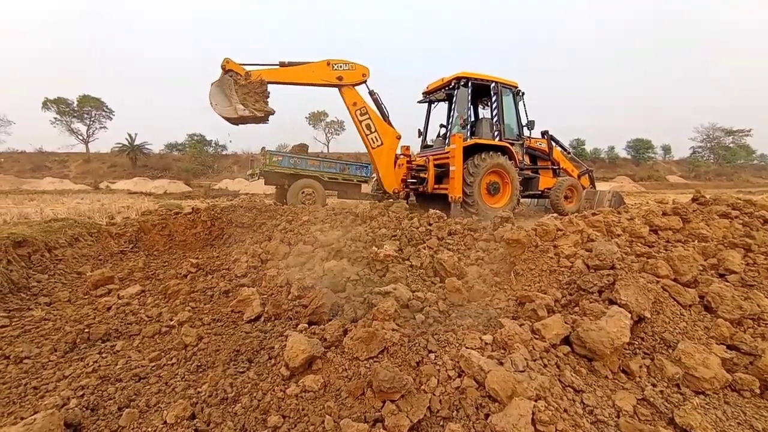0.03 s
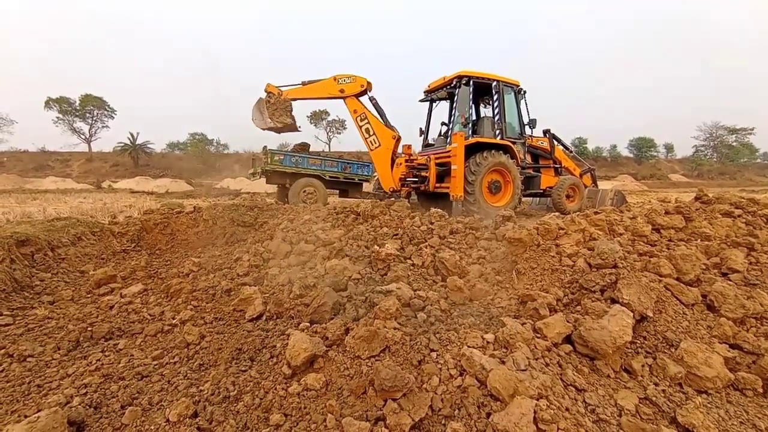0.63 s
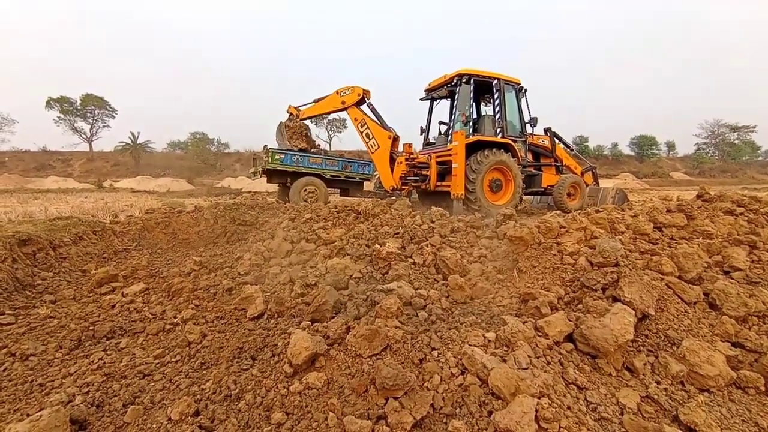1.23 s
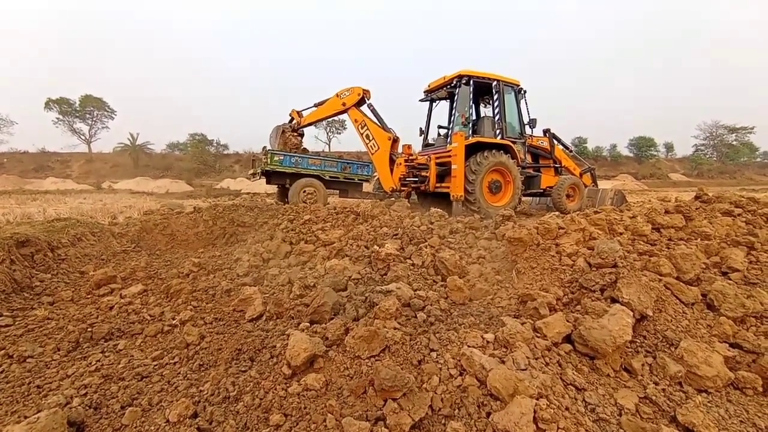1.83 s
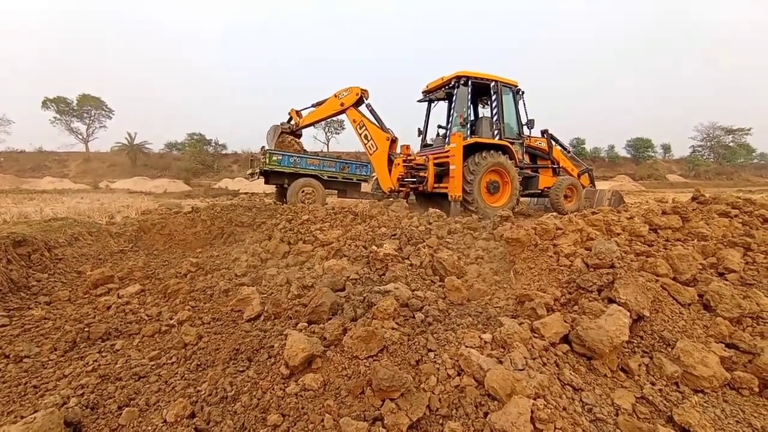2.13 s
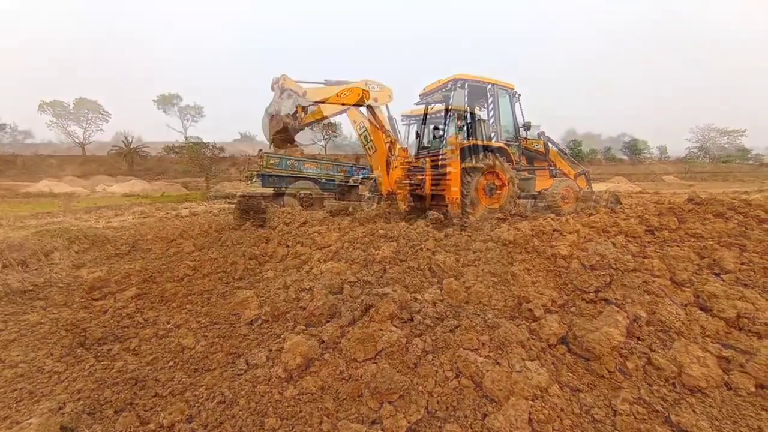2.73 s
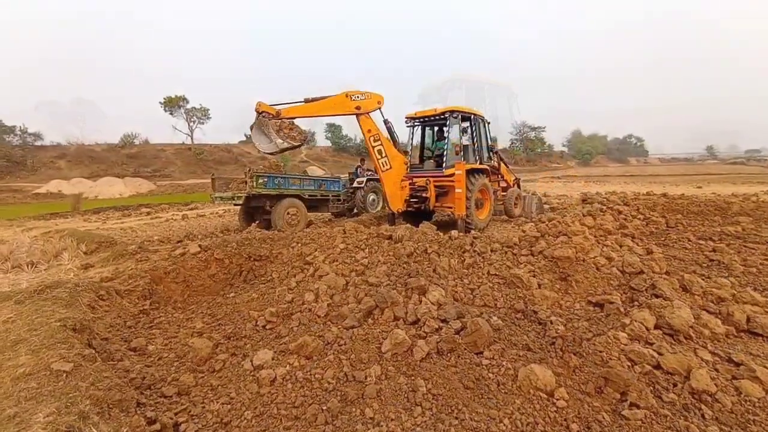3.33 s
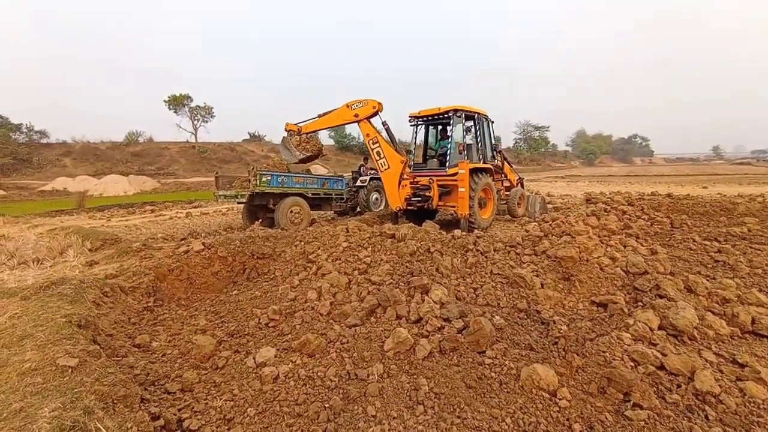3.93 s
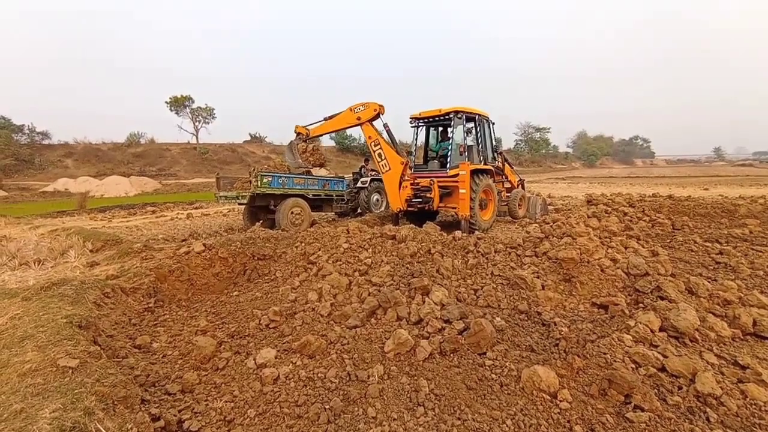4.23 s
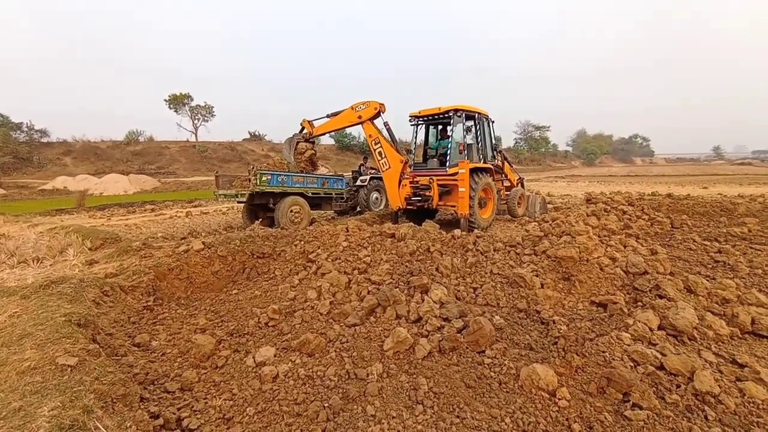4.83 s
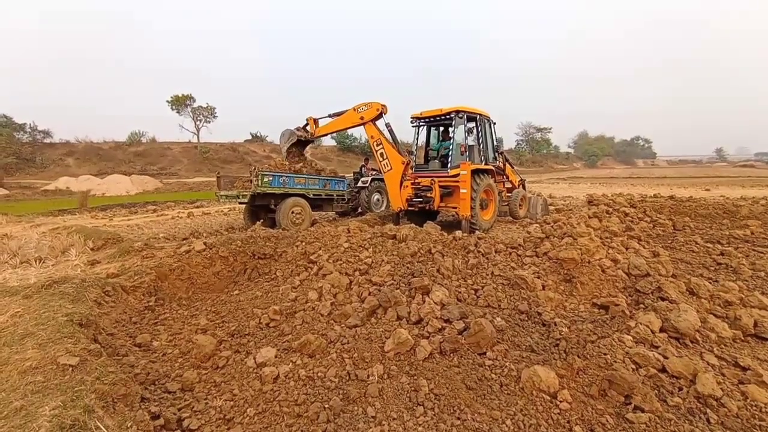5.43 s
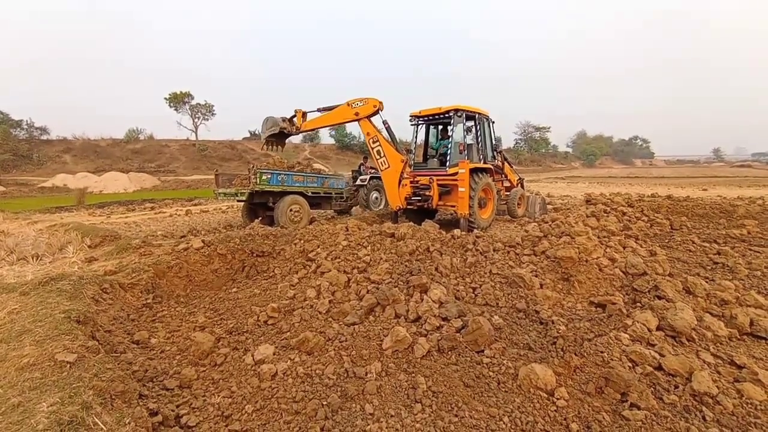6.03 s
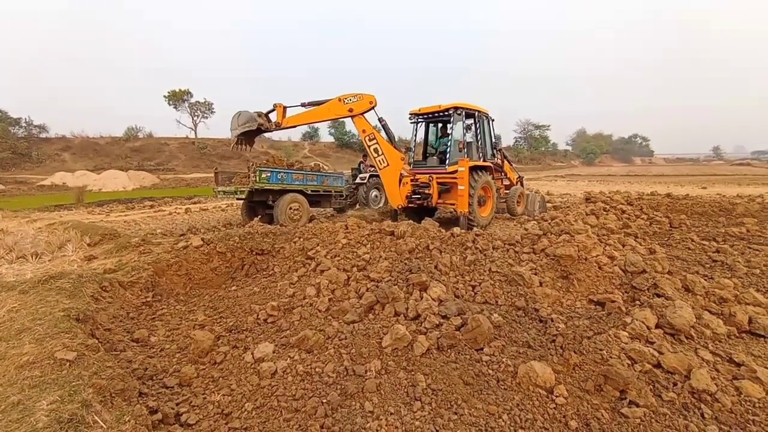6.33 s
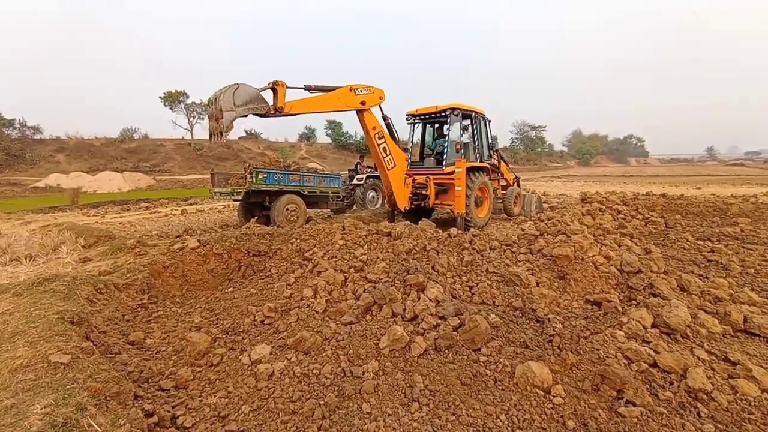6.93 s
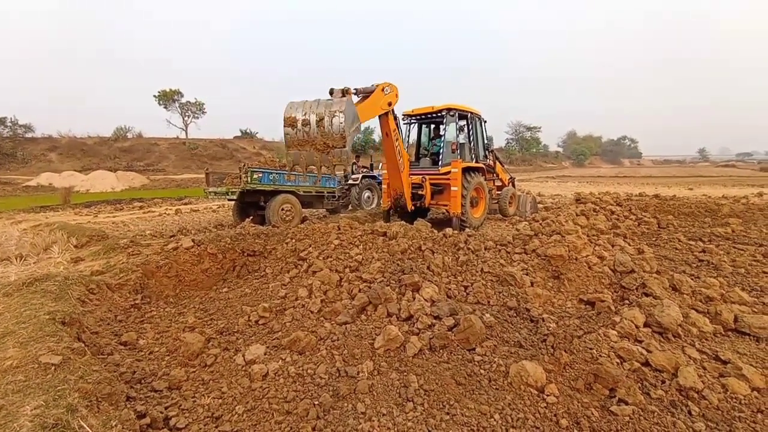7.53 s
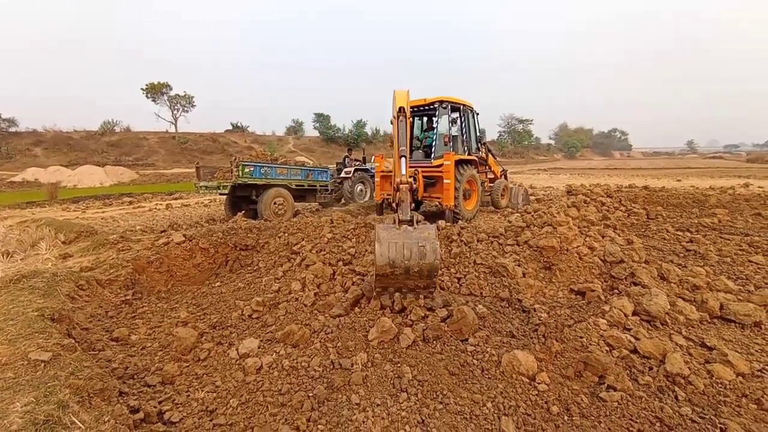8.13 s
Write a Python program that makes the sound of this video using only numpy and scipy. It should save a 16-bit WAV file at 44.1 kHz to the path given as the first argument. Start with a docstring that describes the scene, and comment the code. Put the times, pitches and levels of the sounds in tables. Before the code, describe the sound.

Dry earth thuds and crumbles into a steel trailer over a backhoe's steady diesel rumble, with metal rattles and hydraulic hiss.

```python
"""A backhoe loader's four-cylinder diesel works in an open field, heard from the side, then from
behind and closer. Its firings drive the exhaust drone and pulse the rumble, block clatter and hiss.
The bucket tips dry clods into a steel trailer: they boom on its bed and crumble into grit.
The arm rattles, its pivots squeak, oil rushes through a valve and a light breeze blows."""
import sys
import numpy as np
from scipy import signal
from scipy.fft import rfft, irfft
from scipy.io import wavfile

SR = 44100
rng = np.random.default_rng(int(sys.argv[2]) if len(sys.argv) > 2 else 0)


def wav_out(sig):
    """Save sig, one row per channel (or a flat mono array), as 16-bit PCM at SR to the path in sys.argv[1]."""
    wavfile.write(sys.argv[1], SR, np.round(np.clip(np.atleast_2d(sig).T, -1, 1) * 32767).astype(np.int16))


N = 361179
TIME = np.arange(N) / SR
CUTOFF_HZ = 15600

# Clods landing on the trailer bed. Each row: start in seconds, boom in dB, boom pitch in Hz, crunch in
# dB, grit in dB, breaking time in seconds, struck spot's ring in Hz, its lift in dB, treble limit in Hz.
CLOD_HITS = [(2.171, -15.5, 270, -46, -50, .014, 1500, 4, 9000),
             (2.449, -20, 142, -38, -52, .008, 700, 0, 9000),
             (2.675, -16, 255, -52, -62, .0064, 700, 0, 9000),
             (3.006, -11.5, 256.5, -20.5, -68, .003, 1150, 6, 4000),
             (4.891, -4.5, 245, -18.5, -25, .002, 1300, 5, 17000),
             (4.903, -6.5, 260, -26, -22.5, .005, 7900, 7, 16000),
             (4.936, -18, 248, -16.5, -22.5, .0031, 2380, 8, 16000),
             (4.949, -20, 250, -26.5, -46, .004, 1330, 9, 9000),
             (5.091, -7.5, 279.7, -27, -29, .0041, 5800, 4, 17000),
             (5.11, -3.5, 174.8, -28, -66, .0059, 740, 4, 9000),
             (5.145, -7, 193, -32, -62, .0079, 700, 0, 9000),
             (5.345, -8, 170.4, -50, -47, .0062, 700, 0, 9000),
             (5.638, -18, 250, -26, -33.5, .016, 3800, 9, 15000),
             (5.672, 1, 234.6, -23, -29.5, .013, 9700, 4, 15000),
             (5.68, -5, 310, -27, -28.5, .004, 9700, 4, 15000),
             (5.697, -0.5, 275, -21.5, -37, .0051, 720, 4, 12000),
             (5.975, -3.5, 210.2, -17.5, -38, .013, 2300, 5, 12000),
             (6.043, -3.5, 205.6, -21, -45, .0067, 660, 8, 11000),
             (6.103, -3.5, 235, -23, -15, .0046, 1430, 11, 6200),
             (7.526, -8, 185.3, -20, -41, .021, 1130, 12, 7000),
             (7.595, -2, 262.4, -10, -27, .002, 3800, 7, 5600),
             (7.606, -3, 275, -35, -36, .008, 700, 0, 5500),
             (7.617, -2, 177.4, -34, -50, .006, 700, 0, 9000),
             (7.645, -9, 263, -42, -59, .007, 700, 0, 9000),
             (7.682, -8, 258.3, -19, -41, .004, 1450, 6, 7000),
             (7.712, -11, 258, -40, -52, .016, 700, 0, 6000)]


def from_db(db):
    """Decibels to gain."""
    return np.exp(np.asarray(db) * (np.log(10) / 20))


def unit_rms(x):
    """Scale to unit rms."""
    return x / np.sqrt(np.mean(x ** 2) + 1e-20)


def curve(rows):
    """Straight lines through (seconds, value) points, one value per sample."""
    return np.interp(TIME, *np.transpose(rows))


def drift(rate_hz, step=1):
    """Smooth random wander of unit rms, at every step-th sample."""
    pole = np.exp(-200 * np.pi * rate_hz / SR)
    slow = signal.lfilter([1], [1, -2 * pole, pole * pole], rng.standard_normal(N // 100 + 1002))[1000:]
    return np.interp(np.arange(0, N, step) / 100, np.arange(len(slow)), unit_rms(slow))


def noise():
    """Two independent white noises."""
    return rng.standard_normal((2, N))


def colour(x, spectrum, taps=4096):
    """Minimum-phase filter through (Hz, dB) points."""
    hz, db = np.transpose(spectrum)
    grid_hz = np.maximum(np.arange(taps // 2 + 1) * SR / taps, 1)
    cepstrum = irfft(np.log(from_db(np.interp(np.log(grid_hz), np.log(hz), db))))
    cepstrum[1:taps // 2] *= 2
    cepstrum[taps // 2 + 1:] = 0
    return signal.oaconvolve(x, irfft(np.exp(rfft(cepstrum)))[None], axes=1)[:, :N]


def resonate(x, modes):
    """Each mode lifts or cuts a narrow band."""
    for hz, width_hz, lift_db in modes:
        band = signal.lfilter(*signal.iirpeak(hz, hz / width_hz, fs=SR), x)
        x = x + (from_db(lift_db) - 1) * band
    return x


def part_gain(rear, effort_db, side_db, rear_db, effort_share):
    """Gain of an engine part: set by the listening side, raised by effort."""
    return from_db((1 - rear) * side_db + rear * rear_db + effort_share * effort_db)


def firing_noise(turns, depth, decay_cycles, uneven_db):
    """Noise that surges at each firing, twice a turn, never equally hard."""
    # Strength of each cylinder in dB.
    cylinder_db = [0.29, -0.75, -0.5, 0.69]
    firing, since = np.divmod(2 * turns, 1)
    firing = firing.astype(int)
    white = noise()
    strength_db = np.take(cylinder_db, firing, mode="wrap") + uneven_db * rng.standard_normal(N)[firing]
    return white * unit_rms(1 + depth * from_db(strength_db) * np.exp(-since / decay_cycles))


def exhaust_rumble(turns, rear, effort_db):
    """Rough gas flow puffs out at each firing."""
    # Flow spectra from the side and the rear. Each row: frequency in Hz, relative level in dB.
    side_spectrum = [(25, -22), (55, -13), (85, -3), (140, -2), (195, -5.5), (260, -5.5), (340, 7),
                     (405, -12.5), (700, -39), (3000, -79)]
    rear_spectrum = [(25, -36), (55, -16.5), (85, -2.5), (125, -5), (165, 2), (205, 3.5), (290, 1.5),
                     (350, -7), (410, -6), (700, -37.5), (3000, -76)]
    puffs = firing_noise(turns, depth=2.5, decay_cycles=.3, uneven_db=1.5)
    rumble = np.sqrt(1 - rear) * unit_rms(colour(puffs, side_spectrum))
    rumble += np.sqrt(rear) * unit_rms(colour(puffs, rear_spectrum))
    return rumble * part_gain(rear, effort_db, side_db=-34, rear_db=-28.5, effort_share=.4)


def block_clatter(turns, rear, effort_db):
    """Cylinder knock rings the block and panels."""
    # Block spectrum. Each row: frequency in Hz, relative level in dB.
    block_spectrum = [(100, -40), (400, -13.5), (480, -3.5), (620, -4.5), (770, -4.5), (860, -8.5),
                      (1090, -11.5), (1240, -12.5), (1430, -13.5), (1670, -25.5), (2000, -20),
                      (3000, -26.5), (4000, -34), (9000, -63)]
    # Panel resonances. Each row: frequency in Hz, width in Hz, lift in dB.
    panel_modes = [(527.6, 28, 11.5), (747, 12, 6), (918, 38, 4), (1103, 41, 7), (1450, 44, 5.5),
                   (1800, 27, 7)]
    knocks = firing_noise(turns, depth=1.25, decay_cycles=.27, uneven_db=3.9)
    clatter = unit_rms(resonate(colour(knocks, block_spectrum), panel_modes))
    return clatter * part_gain(rear, effort_db, side_db=-38, rear_db=-31.2, effort_share=.76)


def fan_hiss(turns, rear, rasp_db=.9):
    """Fan and oil valves hiss through the cowl and oil lines; from the side the hiss rasps."""
    # Hiss spectrum. Each row: frequency in Hz, relative level in dB.
    hiss_spectrum = [(700, -22), (1600, 3), (1900, 6.5), (2700, 2.5), (3600, -0.5), (5200, -1.1),
                     (7300, 0.5), (9800, 2), (11500, -3.5), (13500, -9.5), (16000, -16)]
    # Hiss level. Each row: time in seconds, level in dB.
    hiss_level = [(0, -45.5), (1.65, -47), (2.9, -47.5), (3.5, -36.5), (4.35, -38), (5.85, -40),
                  (6.35, -43.5), (7.35, -38.5), (8.19, -36)]
    # Cowl and line resonances from each side. Each row: frequency in Hz, width in Hz, lift in dB.
    side_modes = [(1810, 70, 6), (2010, 70, 5), (2530, 110, 4), (2950, 90, 3.5), (4450, 220, -4),
                  (5220, 200, -3.5), (5520, 150, 3), (6850, 250, 2), (7420, 280, 4), (8110, 220, 3),
                  (9600, 450, 3)]
    rear_modes = [(1990, 60, 8.5), (2595, 57, 11), (2990, 53, 11), (3230, 39, 6.5), (4240, 49, 5.5),
                  (5520, 110, 5.5), (6680, 120, 3.5), (7900, 58, -4.5), (8580, 90, 3), (9100, 140, 4),
                  (9800, 150, 2.5)]
    flow = firing_noise(turns, depth=.23, decay_cycles=.27, uneven_db=4)
    hiss = unit_rms(colour(flow, hiss_spectrum))
    from_side = unit_rms(resonate(hiss, side_modes) * from_db(rasp_db * drift(22)))
    from_rear = unit_rms(resonate(hiss, rear_modes))
    return from_db(curve(hiss_level)) * ((1 - rear) * from_side + rear * from_rear)


def exhaust_tones(turns, rear, effort_db, step=10):
    """Two firings a turn make the drone; unequal cylinders fill in the other crank harmonics."""
    # Drone an octave above the firing rate. Each row: time in seconds, level in dB.
    octave_level = [(0, -27), (.5, -23.5), (2.25, -25.8), (2.5, -22), (3.03, -33), (3.35, -26.5),
                    (3.56, -29), (3.98, -22), (4.25, -30), (4.8, -22), (5.0, -26), (7.48, -26), (7.85, -37),
                    (8.19, -33.5)]
    # Harmonics. Each row: multiple of crank speed, relative dB from the side, relative dB from the rear.
    harmonics = [(3, -59, -42), (5, -44, -42), (6, -39, -29.5), (7, -50, -33), (8, -52, -36.5),
                 (9, -44, -40), (10, -42, -44), (11, -38, -36), (12, -41, -30), (13, -37.5, -41),
                 (14, -36, -46), (15, -44, -45), (18, -53, -43.5), (20, -62, -43), (21, -42.5, -41),
                 (22, -46, -40), (24, -44, -47), (25, -44, -46), (27, -44, -47.5), (29, -71, -45),
                 (31, -77, -43)]
    firing_waver_db, octave_waver_db, bark_waver_db, waver_rad = 1.8, 1.3, 1.9, .093
    angle, rear, effort_db = 2 * np.pi * turns[::step], rear[::step], effort_db[::step]
    firing_gain = part_gain(rear, effort_db, side_db=-47.5, rear_db=-36.5, effort_share=.84)
    drone = firing_gain * from_db(firing_waver_db * drift(4.2, step)) * np.cos(2 * angle)
    drone += from_db(curve(octave_level)[::step] + octave_waver_db * drift(6, step)) * np.cos(4 * angle)
    bark, power = 0, 0
    for multiple, side_db, rear_db in harmonics:
        gain = (1 - rear) * from_db(side_db) + rear * from_db(rear_db)
        scatter_rad = np.pi if multiple % 2 else 1.1   # even harmonics roughly line up on each firing
        phase = rng.normal(0, scatter_rad) + waver_rad * drift(2.9, step)
        bark += gain * from_db(bark_waver_db * drift(5.6, step)) * np.cos(multiple * angle + phase)
        power += gain ** 2
    bark_gain = part_gain(rear, effort_db, side_db=-35, rear_db=-25, effort_share=.86)
    tones = np.sqrt(2) * (drone + bark_gain * bark / np.sqrt(power))
    return signal.resample_poly(tones, step, 1, window="blackmanharris")[:N]


def hydraulic_moans(turns, fade_s=.09, waver_db=3.4, waver_rad=.65):
    """Under hydraulic load single crank harmonics swell, waver and fade."""
    # Each row: start in seconds, length in seconds, multiple of crank speed, level in dB.
    moans = [(0, .62, 22, -40), (3.45, .58, 22, -31.5), (4.03, .47, 24, -35), (4.05, .4, 27, -40),
             (4.36, .3, 12, -31), (5.0, .87, 12, -30.5), (4.43, 1.45, 21, -35.5), (6.2, 1.3, 22, -40),
             (6.25, 1.2, 24, -45), (3.95, .55, 6, -30), (7.76, .55, 6, -31), (7.8, .5, 12, -39)]
    out, sway, wander = np.zeros(N), drift(7), drift(7)
    for start_s, length_s, multiple, db in moans:
        at = np.arange(round(start_s * SR), min(round((start_s + length_s) * SR), N))
        shifted = (at + rng.integers(N)) % N   # each wavers in its own way
        swell = np.clip(np.minimum(TIME[at] - start_s, start_s + length_s - TIME[at]) / fade_s, 0, 1)
        phase = 2 * np.pi * multiple * turns[at] + waver_rad * wander[shifted]
        out[at] += np.sqrt(2) * swell * from_db(db + waver_db * sway[shifted]) * np.cos(phase)
    return out


def engine(bounce_s=.0022):
    """The diesel's noises and tones, all locked to the crank; mid and side."""
    # Crank speed, sagging under hydraulic load. Each row: time in seconds, turns per second.
    crank_speed = [(0, 24.6), (.4, 24.15), (.66, 25.3), (1.75, 25.25), (2.1, 26.1), (2.44, 24.3),
                   (2.7, 25.1), (3.1, 24.1), (3.75, 23.95), (4.02, 25.75), (4.25, 25.95), (4.55, 24.75),
                   (4.85, 25.2), (5.6, 24.95), (5.88, 25.3), (6.22, 23.75), (6.7, 24.6), (7.4, 24.6),
                   (7.6, 25.4), (7.82, 26.3), (8.19, 26.4)]
    # Listening position. Each row: time in seconds, position from 0 (side) to 1 (rear).
    position = [(2.6, 0.058), (3.4, 0.89)]
    # Engine effort. Each row: time in seconds, dB above easy running.
    effort = [(0, 2.0), (.55, 2.6), (.85, 0.0), (2.9, -1.5), (3.5, 0.5), (3.87, 6.5), (4.15, 1), (5.4, 3.5),
              (5.85, 3), (6.35, 2.5), (6.6, 0.9), (7.35, 0.5), (7.85, -4.5), (8.19, -6)]
    turns = np.cumsum(curve(crank_speed)) / SR
    rear, effort_db = curve(position), curve(effort)
    out = exhaust_rumble(turns, rear, effort_db) + block_clatter(turns, rear, effort_db)
    out += fan_hiss(turns, rear)
    tones = exhaust_tones(turns, rear, effort_db) + hydraulic_moans(turns)
    # a late bounce off the earth pile reaches the ears unequally
    return out + np.array([tones, np.roll(tones, round(bounce_s * SR))])


def linkage_knocks(clank_db=-8, grit_db=-22, lift_db=9, top_hz=4500):
    """The bucket linkage takes up slack, ringing steel and shaking grit loose; rows for bursts()."""
    # Each row: start in seconds, level in dB, hold in seconds, joint's ring in Hz.
    knocks = [(1.155, -46, .02, 1650), (1.262, -44, .015, 1300), (1.286, -36, .007, 1600),
              (1.322, -42, .008, 1300), (1.835, -43, .025, 1800), (2.058, -34.5, .002, 760),
              (2.11, -32, .009, 1500), (2.136, -34.5, .003, 2500), (2.17, -28.5, .008, 1650),
              (2.203, -39, .004, 2300), (3.634, -32.5, .0041, 1300), (3.928, -37, .006, 3300),
              (4.63, -32.5, .0071, 1500), (4.798, -34, .0064, 1800), (5.298, -33, .0063, 2600),
              (5.79, -36, .004, 3600), (5.866, -35, .004, 3300), (6.695, -37, .0065, 2600),
              (7.529, -29, .008, 2680), (7.586, -36, .004, 3900), (7.631, -34, .002, 1500),
              (7.714, -35.5, .009, 2600), (7.746, -36, .003, 1450)]
    return [(start_s, db, db + clank_db, db + grit_db, hold_s, ring_hz, lift_db, top_hz)
            for start_s, db, hold_s, ring_hz in knocks]


def steel_db(crunch_db, grit_db):
    """Level of the steel's clank under falling earth: the grittier, the louder."""
    return crunch_db - 5.5 + .37 * (grit_db - crunch_db)


def grit_sprays(crunch_db=.5, hold_s=.0073, ring_hz=9700, lift_db=3, top_hz=17000):
    """Loose grit sprays over sheet steel; rows for bursts()."""
    # Each row: start in seconds, grit level in dB.
    sprays = [(1.835, -48), (2.206, -41), (2.486, -44.5), (2.653, -39), (3.929, -41), (4.03, -41),
              (4.241, -42), (5.062, -34), (5.188, -37), (5.911, -34.5), (6.017, -32), (6.697, -39.5),
              (6.797, -43.5)]
    return [(start_s, db + crunch_db, steel_db(db + crunch_db, db), db, hold_s, ring_hz, lift_db, top_hz)
            for start_s, db in sprays]


def pings(rise_s=.0015, twin_ratio=.965, twin_db=-5):
    """Loose pins and small stones tap the steel; two close modes beat."""
    # Each row: start in seconds, pitch in Hz, level in dB, time to fall 60 dB in seconds.
    taps = [(2.06, 2280, -25, .05), (2.165, 7850, -35, .04), (2.212, 7800, -33, .045),
            (5.096, 5820, -21, .03), (5.099, 8450, -25, .03), (5.189, 5800, -26, .03),
            (5.212, 5880, -23, .035), (5.743, 9450, -33, .14), (5.885, 6950, -36, .1),
            (5.913, 9700, -28, .04), (6.697, 7950, -32, .05), (6.797, 7950, -28, .06), (6.8, 4550, -42, .2)]
    out, t = np.zeros((2, N)), TIME[:SR // 4]
    for start_s, hz, db, t60_s in taps:
        start, phase = round(start_s * SR), 2 * np.pi * hz * t
        ring = np.exp(1j * phase) + from_db(twin_db) * np.exp(1j * twin_ratio * phase)
        envelope = from_db(db - 60 * t / t60_s) * (1 - np.exp(-t / rise_s))
        out[:, start:start + len(t)] += envelope * np.array([ring.imag, ring.real])
    return out


def crumbling_clods():
    """Dry clods break on the steel; rows for bursts()."""
    return [(start_s, crunch_db, steel_db(crunch_db, grit_db), grit_db, *rest)
            for start_s, _, _, crunch_db, grit_db, *rest in CLOD_HITS]


def bursts(events, grain_db=2, ring_q=9):
    """Clusters of small impacts: crunch, clank and grit noise, coloured by the struck spot."""
    # Breaking earth, struck steel and fine grit. Each row: frequency in Hz, relative level in dB.
    crunch = [(100, -22.5), (270, 6), (420, -6), (560, 2), (720, 4), (900, -7), (1350, -10), (1700, -13),
              (4000, -32), (12000, -71)]
    clank = [(300, -59), (1000, -11), (1500, -1.5), (2400, -0.5), (3100, 0.5), (3800, -3.5), (5300, -12),
             (8000, -32), (16000, -60)]
    grit = [(500, -45), (2500, -24), (4300, -3.5), (5300, 0.5), (8000, 1), (10000, -1), (12000, -11),
            (16000, -22)]
    # Bucket and tailgate modes. Each row: frequency in Hz, width in Hz, lift in dB.
    steel_modes = [(735, 40, 2), (1077, 26, 4.5), (1325, 41, 7), (2440, 60, 4.5), (2630, 67, 4.5),
                   (3580, 30, 3.5), (3900, 36, 6), (5800, 120, 2.5)]
    crack_db, crack_t60_s, tail_db, tail_t60_s = -3, .017, -21, .42
    out = np.zeros((2, N))
    layers = np.array([unit_rms(colour(noise(), spectrum)) for spectrum in (crunch, clank, grit)])
    decay_shares = np.array([[1], [1.01], [.58]])
    for start_s, crunch_db, clank_db, grit_db, hold_s, ring_hz, lift_db, top_hz in events:
        start = round(start_s * SR)
        t = TIME[:min(SR // 2, N - start)]
        at = slice(start, start + len(t))
        attack = 1 - np.exp(-t / (.19 * hold_s))   # a slow break starts softer and lasts longer
        t60_s = (.089 + 7.2 * hold_s) * decay_shares
        crack = from_db(crack_db - 60 * t / crack_t60_s)   # first contact
        body = from_db(-60 * np.maximum(t - hold_s, 0) / t60_s)
        tail = from_db(tail_db - 60 * t / tail_t60_s)   # return from the earth banks
        envelopes = from_db([[crunch_db], [clank_db], [grit_db]]) * (crack + body + tail) * attack
        hit = (envelopes[:, None] * layers[:, :, at]).sum(0)
        hit = signal.lfilter(*signal.butter(2, top_hz, fs=SR), hit)
        width_hz, overtone_hz = ring_hz / ring_q, min(2.17 * ring_hz, CUTOFF_HZ)
        out[:, at] += resonate(hit, [(ring_hz, width_hz, lift_db), (overtone_hz, width_hz, .4 * lift_db)])
    return resonate(out * unit_rms(from_db(grain_db * drift(120))), steel_modes)


def trailer_booms(t60_s=.17, rise_s=.0026, detune=.017):
    """Each clod sets a patch of the loaded steel bed swinging in a few modes."""
    # Bed modes. Each row: multiple of the boom's pitch, relative level in dB.
    bed_modes = [(.7, -9.5), (1, -0.5), (1.21, -8.5), (1.38, -18), (2.6, -16)]
    ratios, mode_db = np.transpose(bed_modes)
    out, t = np.zeros((2, N)), TIME[:SR // 2]
    envelope = (1 - np.exp(-t / rise_s)) * from_db(-60 * t / t60_s)
    for start_s, boom_db, hz, *_ in CLOD_HITS:
        mode_hz = hz * ratios * (1 + rng.normal(0, detune, len(ratios)))
        phase = 2 * np.pi * mode_hz[:, None] * t
        ring = from_db(mode_db) @ np.array([np.sin(phase), np.cos(phase)])
        start = round(start_s * SR)
        out[:, start:start + len(t)] += (from_db(boom_db) * envelope * ring)[:, :N - start]
    return out


def pivot_squeaks(waver=.011, rasp_db=4.5, climb_per_s=1.05):
    """A dry pin sticks and slips: short rising whistles, unsteady in pitch and level."""
    # Each row: start in seconds, length in seconds, starting pitch in Hz, level in dB.
    squeaks = [(2.456, .016, 7300, -41), (2.484, .016, 7400, -38), (2.497, .014, 6850, -41),
               (4.085, .02, 7600, -23.5), (4.097, .055, 1490, -25), (4.097, .034, 6020, -38),
               (4.1, .06, 7450, -32), (4.117, .028, 7080, -29), (4.144, .056, 6380, -33),
               (4.157, .02, 7450, -34)]
    out, wobble, grip = np.zeros((2, N)), 1 + waver * drift(200), from_db(rasp_db * drift(200))
    for start_s, length_s, hz, db in squeaks:
        at = np.arange(round(start_s * SR), round((start_s + length_s) * SR))
        progress = np.linspace(0, 1, len(at))
        pitch_hz = hz * (1 + climb_per_s * length_s * progress) * wobble[at]
        phase = 2 * np.pi * np.cumsum(pitch_hz) / SR
        swell = from_db(db) * grip[at] * np.sin(np.pi * progress ** .74)
        out[:, at] += swell * np.array([np.sin(phase), np.cos(phase)])
    return out


def breeze(gust_db=2.5):
    """Light wind buffets each ear on its own: soft, lumpy bass."""
    # Buffeting spectrum. Each row: frequency in Hz, relative level in dB.
    wind_spectrum = [(25, -34), (50, -16), (75, -3), (105, 0), (140, -5), (200, -13), (400, -26),
                     (1500, -60)]
    # Wind level. Each row: time in seconds, level in dB.
    wind_level = [(0, -58), (2.7, -58), (3.3, -42), (3.9, -36.5), (4.6, -42), (6.3, -45), (7.4, -43),
                  (7.9, -39), (8.19, -39)]
    return from_db(curve(wind_level) + gust_db * drift(5)) * unit_rms(colour(noise(), wind_spectrum))


def oil_valve(start_s=3.05, length_s=.62, hz=3120, width_hz=220, db=-44):
    """Oil rushes through a valve as the arm swings: a narrow hiss swells and fades."""
    start, swell = round(start_s * SR), np.sqrt(np.hanning(round(length_s * SR)))
    flow = noise()[:, :len(swell)]
    rush = unit_rms(signal.lfilter(*signal.iirpeak(hz, hz / width_hz, fs=SR), flow))
    return np.pad(from_db(db) * swell * rush, ((0, 0), (start, N - start - len(swell))))


def to_stereo(source, left_db):
    """Mid and side to left and right: bass alike at both ears, treble scattered."""
    # Scattered sound. Each row: frequency in Hz, gain of the side signal in dB.
    side_response = [(60, -28), (110, -30), (200, -22), (380, -13), (600, -18), (800, -9), (1290, -3),
                     (2380, -2), (4400, 1), (8120, -1.5), (15000, 0.5)]
    mid, side = source[0], colour(source[1:], side_response)[0]
    return np.array([mid + side, mid - side]) * from_db([[left_db / 2], [-left_db / 2]])


def scene():
    """Engine and booms near the middle, the crumbling load slightly right, breeze on both sides."""
    machine = to_stereo(engine() + oil_valve(), left_db=-.2)
    impacts = bursts(crumbling_clods() + linkage_knocks() + grit_sprays())
    load = to_stereo(impacts + pivot_squeaks() + pings(), left_db=-1.2)
    booms = to_stereo(trailer_booms(), left_db=-.1)
    return machine + load + booms + breeze()


def record(dry):
    """Soft-clip the hardest blows, then cut the top treble."""
    clipped = dry / (1 + dry ** 8) ** (1 / 8)
    return signal.sosfiltfilt(signal.ellip(10, .05, 70, CUTOFF_HZ, fs=SR, output="sos"), clipped)


dry = scene()
out = record(dry)
wav_out(out)
```